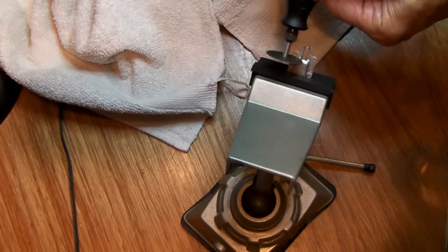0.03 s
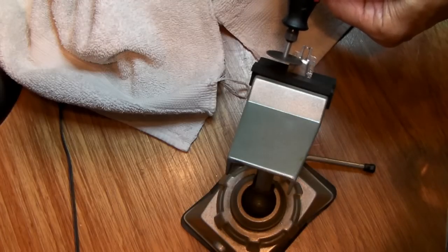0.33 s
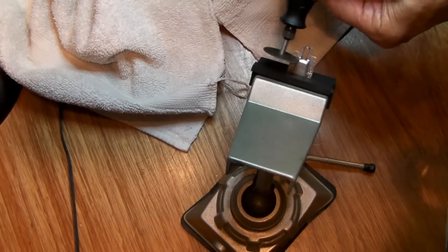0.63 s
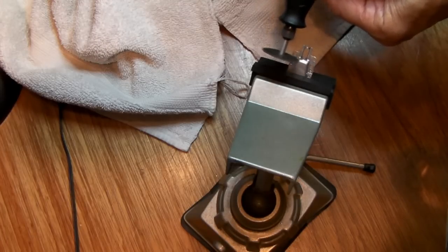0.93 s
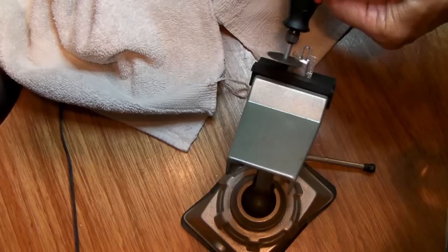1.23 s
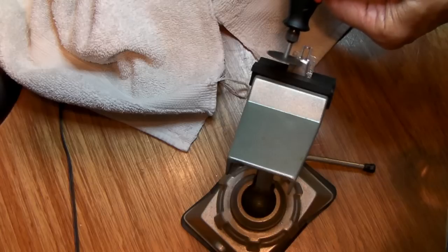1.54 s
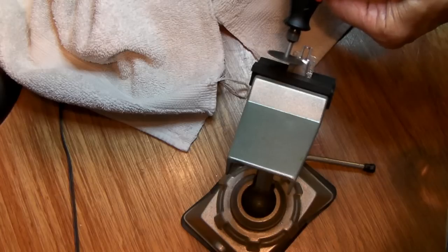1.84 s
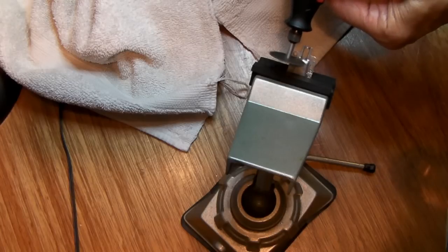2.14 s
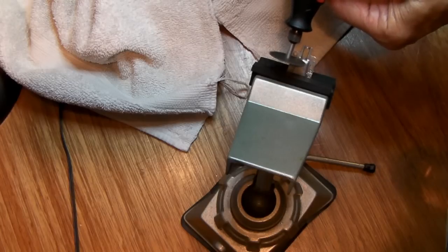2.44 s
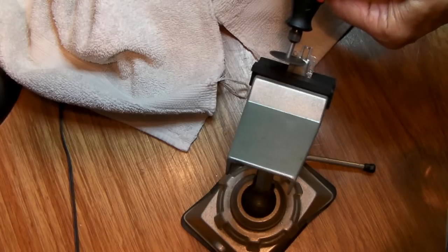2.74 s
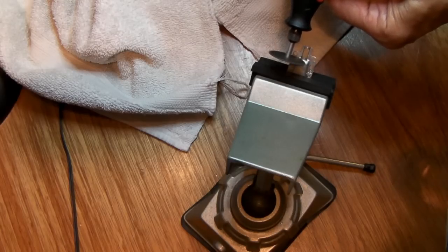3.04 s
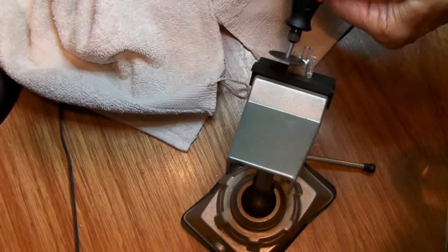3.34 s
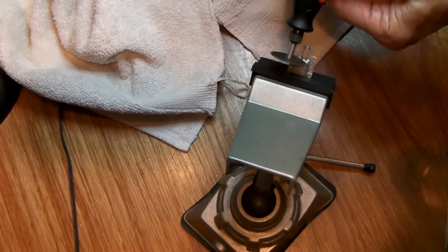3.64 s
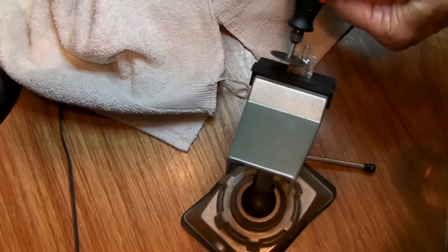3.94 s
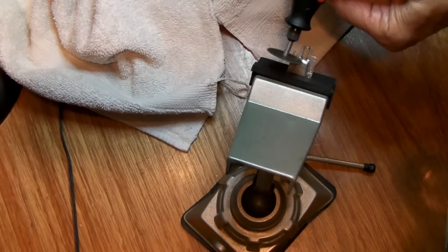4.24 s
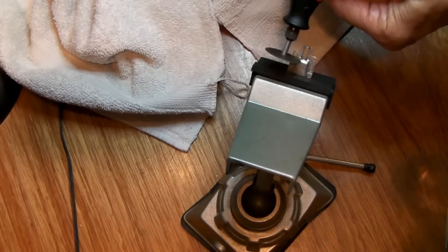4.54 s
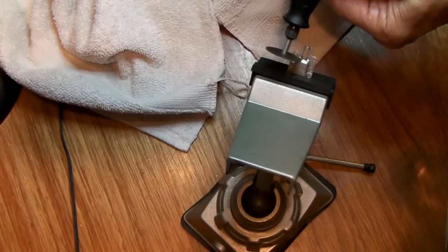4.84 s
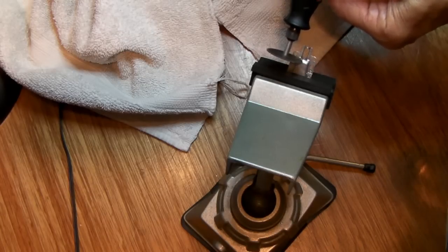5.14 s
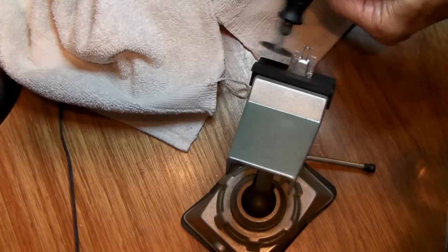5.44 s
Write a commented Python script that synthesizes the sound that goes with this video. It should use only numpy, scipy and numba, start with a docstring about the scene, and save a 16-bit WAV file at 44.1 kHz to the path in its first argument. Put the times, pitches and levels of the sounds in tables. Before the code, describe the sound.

A small electric rotary tool grinds into metal held in a vise, then jams with a brief low hum. It snags free with sharp scrapes and spins up to a high whine. A long stretch of gritty cutting follows, with short squeals and a pitch that wavers and dips. Near the end it jams again, snags loose and speeds up. The sound is close, in a small room.

```python
"""A small electric rotary tool cuts a metal part clamped in a bench vise. The cut-off wheel, slightly
out of true, scrapes once a turn, rings the part, thumps the bench, squeals and drags the speed down.
At 0.5 s it jams, hums and snags as it is pulled free; the motor spins up and whines. From 1.5 s it
cuts again, with short breaks. At 5.2 s it jams once more, snags free and speeds up."""
import sys
import numpy as np
from scipy import signal
from scipy.fft import irfft
from scipy.io import wavfile
from scipy.ndimage import uniform_filter1d
from numba import njit

SR = 44100
rng = np.random.default_rng(int(sys.argv[2]) if len(sys.argv) > 2 else 0)


def persist_wave(psi):
    """Save psi, clipped to +-1, as 16-bit WAV."""
    counts = np.round(np.clip(psi, -1, 1) * 32767).astype(np.int16)
    wavfile.write(sys.argv[1], SR, np.atleast_2d(counts).T)


N = 246959
TIME = np.arange(N) / SR
FREQ = np.maximum(np.fft.rfftfreq(4096, 1 / SR), 1)
FREE_HZ = 187.2  # unloaded shaft

# wheel on metal: start_s, length_s, lag_s, level_db, wheel_ring_rel_db, edge_ring_rel_db
CONTACTS = [(-.1, .603, 0.0027, -22, -6.5, 0), (1.508, .034, .002, -20, -13, 1),
            (1.584, 0.3, 0.0032, -20.5, -3.5, -0.5), (1.905, 2.575, .025, -21, -10, -5.5),
            (4.695, .09, 0.0026, -25.5, 3, -3), (4.835, 0.37, 0.0068, -20.5, -2.5, -4)]
# hand presses the wheel deeper: start_s, length_s, brake_hz, scrape_rel_db, edge_rel_db, bench_rel_db
PUSHES = [(-0.176, 0.28, 30, -0.6, -2, -3.5), (0.137, 0.12, 60, 0, -3.5, -2), (0.32, 0.07, 90, -0.5, -5, 1),
          (0.434, 0.068, 38.5, 2.5, -10, 4), (1.693, 0.034, 90, -0.5, -1, -9.5),
          (1.796, 0.063, 24, -4.7, 4.5, -4), (1.936, 0.16, 32, 0.5, 3, 0.5), (2.206, 0.069, 58, 1.5, -1, 2),
          (2.393, 0.09, 58, 1.5, -2.5, -2), (2.566, 0.095, 45, 0, -3, -1), (2.681, 0.29, 42, 0, 0, 1.3),
          (3.01, 0.21, 36, 0.5, 2.0, 1), (3.205, 0.091, 60, 1, 0, -3), (3.403, 0.058, 76, -0.5, 0, -5),
          (3.469, 0.088, 32, -1.5, 3, 4.5), (3.646, 0.035, 87, 1, -1, -4.6),
          (3.685, 0.14, 26, 0.1, -5, 1.1), (3.856, 0.19, 40, 2.0, -1, 4.5), (4.118, 0.29, 54, 2, -3.5, 3.0),
          (4.565, 0.14, 3, 6.5, -4, -5), (4.693, 0.05, 9, -2, 10, -4.9), (4.917, 0.28, 20, 0.1, -0.5, -1)]
# wheel jams: start_s, length_s, brake_hz, hum_db
JAMS = [(0.493, .118, 125, -36.5), (5.222, 0.19, 127.5, -59)]
# grit on metal: freq_hz, level_db
GRIT_SPECTRUM = [(200, -26.5), (650, -20.5), (1000, -13.5), (2100, -2.5), (2900, -12.5), (3700, -2.5),
                 (5400, -4), (7000, -2), (10000, 0), (12300, -7), (14000, -6.5), (16000, -17.5)]
# clamped part: freq_hz, width_hz, level_db
PART_MODES = [(3830, 370, -10.5), (4280, 290, -0.5), (4890, 510, -2), (5985, 320, -1), (6800, 790, -2),
              (7460, 180, -0.5), (7670, 130, -8), (8570, 760, 0.5), (13060, 470, -3.5)]
# thin wheel: freq_hz, width_hz, level_db
WHEEL_MODES = [(9410, 300, 2.5)]


def undb(db):
    """Decibels to gain."""
    return 10 ** (np.asarray(db) / 20)


def unit(x):
    """Scale to rms 1."""
    return x / np.sqrt(np.mean(x ** 2))


def steady(x):
    """Hold the 50 ms rms at 1."""
    return x / np.sqrt(uniform_filter1d(x ** 2, SR // 20))


def curves(at, rows):
    """Interpolate a table's columns over its first."""
    knots, *columns = np.transpose(rows)
    return [np.interp(at, knots, column) for column in columns]


def shape(points):
    """Frequency response from (freq_hz, level_db) points."""
    hz, db = np.transpose(points)
    return undb(np.interp(np.log(FREQ), np.log(hz), db))


def modes(rows):
    """Response of damped resonances."""
    return sum(undb(db) / (1 + 1j * (FREQ / hz - hz / FREQ) * hz / width) for hz, width, db in rows)


def through(x, response):
    """Filter by a frequency response."""
    kernel = np.fft.fftshift(irfft(response))
    return signal.oaconvolve(x, kernel * np.hanning(len(kernel)), "same")


def ringing(drive, rows):
    """Driven resonances with steep skirts, rms 1."""
    response = modes(rows)
    return unit(through(drive, response * abs(response) ** .5))


def walk(rate_hz):
    """Random wander, rms 1."""
    steps = rng.standard_normal(N // 8)
    return unit(np.interp(TIME * rate_hz, np.arange(len(steps)), steps))


def during(start_s, length_s):
    """1 while an event lasts, else 0."""
    return 1. * ((TIME >= start_s) & (TIME < start_s + length_s))


def lag(x, lag_s):
    """Follow a control with inertia."""
    keep = np.exp(-1 / (lag_s * SR))
    return signal.lfilter([1 - keep], [1, -keep], x, zi=[keep * x[0]])[0]


@njit
def recur(fresh, period_samples, memory):
    """Noise that partly repeats one period later."""
    y = fresh.copy()
    for i in range(len(y)):
        j = i - int(period_samples[i] + .5)
        if j >= 0:
            y[i] = memory * y[j] + np.sqrt(1 - memory ** 2) * fresh[i]
    return y


def surface(hz, renewal):
    """Turning roughness: the same grains come round again, a share of them renewed."""
    return recur(rng.standard_normal(N), SR / hz, np.sqrt(1 - renewal))


def once_a_turn(turns, width_turns, rest):
    """One smooth swell per turn over a resting level."""
    return unit(np.exp(-(np.sin(np.pi * turns) / (np.pi * width_turns)) ** 2) + rest)


def shaft():
    """Touches, pushes and jams brake the shaft; it sags and recovers with its inertia."""
    touch_brake_hz, inertia_s, creep_s, creep_share = 8.2, 0.07, 0.55, 0.018
    touch = sum(during(start_s, length_s) for start_s, length_s, *_ in CONTACTS)
    brake_hz = sum(hz * during(start_s, length_s) for start_s, length_s, hz, *_ in [*PUSHES, *JAMS])
    brake_hz += touch_brake_hz * touch
    sag_hz = (1 - creep_share) * lag(brake_hz, inertia_s) + creep_share * lag(brake_hz, creep_s)
    return uniform_filter1d(FREE_HZ - sag_hz, SR // 50), touch


def by_speed(hz):
    """Motor and bench levels in dB follow the shaft speed."""
    # loudness against speed: shaft_hz, motor_db, bench_db
    speed_levels = [(64.8, -60.5, -65), (108, -40, -56), (130, -36.5, -46.5), (151.4, -33.5, -46),
                    (146.3, -40.5, -44), (163, -28.5, -52), (179.12, -23.5, -48), (186.74, -16.5, -47)]
    return curves(hz, speed_levels)


def pressing():
    """What the pushes add to scrape, edge and bench, in dB."""
    added_db = sum(np.outer(levels_db, during(start_s, length_s))
                   for start_s, length_s, _, *levels_db in PUSHES)
    return [lag(db, lag_s=0.012) for db in added_db]


def motor(hz, turns, load, touch):
    """Shaft harmonics ring the housing and roughen under load; brushes buzz, cooling air rasps."""
    # free-running whine at whine_hz: harmonic, level_db
    harmonics = [(1, -30), (2, -17), (3, -20), (4, -12), (5, -9), (6, -11), (7, -22), (8, -10), (9, -25),
                 (10, -11), (11, -8), (12, -3), (13, 0), (14, -16), (15, -24), (16, -14), (17, -12),
                 (18, -13), (19, -22), (20, -22), (21, -7), (22, -17), (23, -19), (24, -21), (25, -27),
                 (26, -12), (27, -7), (28, -16), (29, -21)]
    # motor housing: freq_hz, width_hz, level_db
    housing_modes = [(320, 45, 15), (440, 55, 7), (856, 40, 17), (1400, 70, 15)]
    # brush buzz and cooling air: freq_hz, level_db
    brush_spectrum = [(300, -12), (800, 3), (2200, 9.5), (2900, 10), (5200, 4.5), (7200, 1.5), (9500, -1.5),
                      (12000, -1), (14000, -6.5), (16000, -14)]
    # slow swells, loudest with the tool lifted closer: time_s, motor_rel_db, low_harmonics_rel_db
    swells = [(0, -2, -3), (.74, 1, -2), (.83, 5, -1.5), (.93, 0, 1), (1.5, 1, -0.5), (1.7, -1.5, -3.5),
              (1.92, -4.5, 5.5), (2.2, 1, -1.5), (4.4, -10, 3.5), (4.66, 3.5, -7.5), (4.95, -1.5, 0),
              (5.25, -2.5, 4), (5.53, 7, -2)]
    whine_hz, buzz_from_hz = 186.8, 5300
    housing = np.sqrt(1 + sum(abs(modes([row])) ** 2 for row in housing_modes))
    orders, order_db = np.transpose(harmonics)
    drive_db = order_db - 20 * np.log10(np.interp(orders * whine_hz, FREQ, housing))
    body = undb(np.interp(FREQ, orders * whine_hz, drive_db)) * housing
    swell_db, low_db = curves(TIME, swells)
    whine = np.zeros(N)
    for k in orders[1:]:  # the fundamental sounds through the bench
        flutter_db = (1.4 + 6 * load) * walk(45)
        db = flutter_db - 12 * load * k / len(orders) + low_db * (2 < k <= 8)
        whine += np.interp(k * hz, FREQ, body) * undb(db) * np.sin(2 * np.pi * (k * turns + rng.random()))
    whine = undb(0.5 - 7 * load) * steady(whine)
    buzz = surface(hz, renewal=0.036) * once_a_turn(turns, width_turns=0.41, rest=0.25)
    buzz = undb(-8) * unit(through(buzz, shape(brush_spectrum) * (FREQ > buzz_from_hz)))
    air = undb(-22 + 17 * np.sqrt(load)) * unit(through(rng.standard_normal(N), shape(brush_spectrum)))
    damping_db = -3.5 * lag(touch, lag_s=0.0066)  # touching the metal damps the motor
    return undb(by_speed(hz)[0] + swell_db + damping_db) * (whine + buzz + air)


def scrape(hz, turns, renewal):
    """The wheel's high side drags grit over the metal once a turn, each time with a different force."""
    force = undb(rng.standard_normal(N // 100))[(turns + .5).astype(int)]
    sparks = undb(0.45 * walk(3000))
    return surface(hz, renewal) * once_a_turn(turns, width_turns=0.21, rest=0.22) * force * sparks


def wandering_contact(x, spread_db, rate_hz):
    """The point of contact wanders: narrow bands swell and fade independently."""
    centres_hz = np.linspace(0, 16000, 33)
    bands = (np.maximum(1 - abs(FREQ - hz) / centres_hz[1], 0) for hz in centres_hz)
    return sum(through(x, band) * undb(spread_db * walk(rate_hz)) for band in bands)


def cutting(hz, turns, load):
    """Each contact hisses with grit and rings part, wheel and edge; squeals duck the scrape."""
    # edge being cut: freq_hz, width_hz, level_db
    edge_modes = [(10760, 580, 1), (11240, 1500, 6)]
    drag = wandering_contact(scrape(hz, turns, renewal=0.47), spread_db=2.5, rate_hz=19)
    hiss = unit(unit(through(drag, shape(GRIT_SPECTRUM))) + undb(0.5) * ringing(drag, PART_MODES))
    # a light graze is mostly treble; a deeper bite fills in the lower modes
    treble = through(hiss, shape([(8000, -7), (9400, 8.5)]))
    hiss = treble + undb(-11 * (1 - load) ** 2) * (hiss - treble)
    push_db, edge_push_db, _ = pressing()
    wheel = ringing(drag, WHEEL_MODES)
    edge = undb(edge_push_db) * ringing(drag, edge_modes)
    grind = np.zeros(N)
    for start_s, length_s, lag_s, level_db, wheel_db, edge_db in CONTACTS:
        contact = lag(during(start_s, length_s), lag_s) * undb(level_db)
        grind += contact * (hiss + undb(wheel_db) * wheel + undb(edge_db) * edge)
    squeal, duck_db = squeals(hz, turns)
    return grind * undb(push_db + duck_db) + squeal


def bench(hz, turns):
    """The bench top booms with the shaft's lowest harmonics."""
    # bench top: freq_hz, width_hz, level_db
    bench_modes = [(135, 7.3, 8.5), (346, 24, -2), (405, 26, -2.5)]
    boom = np.sqrt(sum(abs(modes([row])) ** 2 for row in bench_modes))
    tone = sum(np.interp(k * hz, FREQ, boom) * np.sin(2 * np.pi * k * turns) for k in (1, 2, 3))
    return steady(tone) * undb(by_speed(hz)[1] + pressing()[2] + 2.8 * walk(40))


def squeals(hz, turns):
    """The binding wheel repeats more exactly each turn; part or wheel squeals, with an octave above."""
    # wheel binds in the slot: centre_s, pitch_hz, level_db, half_length_s
    binds = [(0.063, 4130, -24, 0.027), (0.304, 4220, -24.5, 0.059), (0.44, 4750, -21, 0.03),
             (1.66, 11170, -17, 0.02), (1.679, 4220, -20, 0.039), (1.821, 4500, -21, 0.071),
             (1.96, 4060, -21.5, 0.025), (2.081, 4743, -23, 0.08), (2.297, 4700, -21.5, 0.038),
             (2.555, 4600, -18.5, 0.027), (2.799, 4790, -21.5, 0.045), (3.052, 4236, -36, 0.056),
             (3.142, 10900, -19, .03), (3.262, 4200, -24, 0.019), (3.315, 4750, -20, 0.022),
             (3.51, 4830, -21, 0.027), (3.65, 10880, -20, 0.11), (3.788, 11300, -19, 0.035),
             (3.883, 4917, -20.5, 0.055), (3.957, 6640, -20, 0.016), (4.029, 4880, -21.5, 0.042),
             (4.11, 10900, -20, 0.037), (4.25, 4857, -23, .05), (4.364, 4200, -22, 0.1),
             (4.709, 9540, -17.5, 0.021), (4.86, 9440, -15, .025), (4.953, 9260, -22, 0.041),
             (5.11, 3980, -25.5, 0.06)]
    width_hz, octave_db, scrape_duck_db = 370, -2, -2
    drag = scrape(hz, turns, renewal=0.2)
    squeal, binding = np.zeros((2, N))
    for centre_s, pitch_hz, level_db, half_length_s in binds:
        swell = np.exp(-1.5 * ((TIME - centre_s) / half_length_s) ** 2)
        binding += swell
        ring = ringing(drag, [(pitch_hz, width_hz, 0), (2 * pitch_hz, width_hz, octave_db)])
        squeal += undb(level_db) * swell * ring
    return squeal, scrape_duck_db * binding


def jam_hum():
    """The jammed motor hums through the bench."""
    hum_hz = 65
    stall = sum(undb(hum_db) * during(start_s, length_s) for start_s, length_s, _, hum_db in JAMS)
    phase = 2 * np.pi * np.cumsum(hum_hz * (1 + 0.02895 * walk(23.4))) / SR
    return lag(stall, lag_s=0.12) * (np.sin(phase) + undb(5.5) * np.sin(2 * phase))


def snags():
    """Short hard scrapes as the wheel jams or comes free; each rings the part and knocks the bench."""
    # wheel catches the slot's edge: peak_s, level_db, rise_and_decay_s, ring_rel_db, knock_rel_db
    catches = [(.500, -19.5, 0.0037, -14, -32), (0.663, -12, 0.0028, -8, -22),
               (0.677, -12, 0.0011, -3, -29), (0.683, -21, 0.014, -14, -48), (5.232, -18, 0.0061, -25, -31),
               (5.437, -12, 0.0014, -35, -14.5), (5.454, -11.5, 0.0067, -22, -26)]
    knock_hz, knock_decay_s = 125, 0.01
    scratch, ring, knock = np.zeros((3, N))
    for peak_s, level_db, decay_s, ring_db, knock_db in catches:
        burst = undb(level_db) * np.exp(-abs(TIME - peak_s) / decay_s)
        scratch += burst
        ring += burst * undb(ring_db)
        age_s = np.maximum(TIME - peak_s, 0)
        thud = np.exp(-age_s / knock_decay_s) * np.sin(2 * np.pi * knock_hz * age_s)
        knock += undb(level_db + knock_db) * thud
    noise = rng.standard_normal(N)
    grit = unit(through(noise, shape(GRIT_SPECTRUM) * (1 + modes(WHEEL_MODES))))
    return scratch * grit + ring * ringing(noise, PART_MODES) + knock


def echoes(x, delay_s, t60_s):
    """Dense reflections that start after a delay and die away."""
    age_s = TIME[:SR // 2]
    tail = rng.standard_normal(len(age_s)) * undb(-60 * age_s / t60_s)
    return signal.fftconvolve(x, np.pad(tail, (int(delay_s * SR), 0)) / np.linalg.norm(tail))[:N]


def scene():
    """Tool, cut and bench, close up and in stereo, in a small room."""
    # stereo side against mid: freq_hz, level_db
    side_spectrum = [(60, -33), (700, -41), (1300, -36), (2400, -20), (4400, -9.5), (8000, -4), (14000, -4)]
    # quiet room: freq_hz, level_db
    room_spectrum = [(25, -17.5), (70, -4.5), (130, -2), (250, -18), (1000, -22.5), (4000, -29),
                     (16000, -26)]
    hz, touch = shaft()
    load = np.clip((FREE_HZ - hz) / 40, 0, 1)
    hz = hz * (1 + (0.00012 + .007 * load) * walk(80))  # the grabbing wheel makes the speed shudder
    turns = np.cumsum(hz) / SR
    tool = motor(hz, turns, load, touch) + bench(hz, turns) + jam_hum()
    catches = snags()
    metal = cutting(hz, turns, load) + catches
    # vise and bench scatter differently to each side; the wheel's two faces scrape separately
    scatter = echoes(tool + catches, delay_s=0, t60_s=0.0073)
    side = through(scatter + cutting(hz, turns, load), shape(side_spectrum))
    send = undb(-12.5) * tool + undb(-8) * metal
    room = np.array([echoes(send, delay_s=0.003, t60_s=0.22) for _ in range(2)])
    room_tone = undb(-60) * unit(through(rng.standard_normal(N), shape(room_spectrum)))
    return tool + metal + np.array([side, -side]) + room + room_tone


def record(dry):
    """Soft clip, then a steep low-pass."""
    cutoff_hz = 15700
    return signal.sosfilt(signal.ellip(10, .2, 80, cutoff_hz, fs=SR, output="sos"), np.tanh(dry))


dry = scene()
out = record(dry)
persist_wave(out)
```